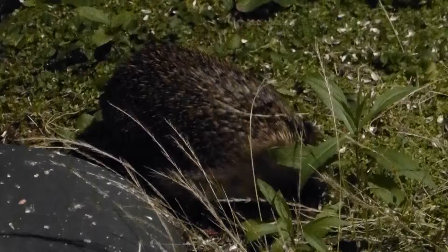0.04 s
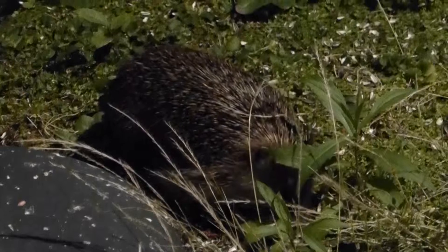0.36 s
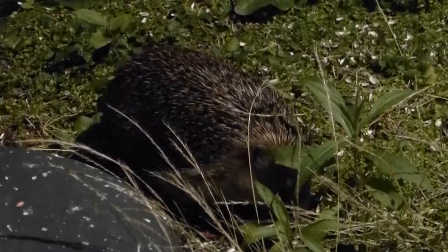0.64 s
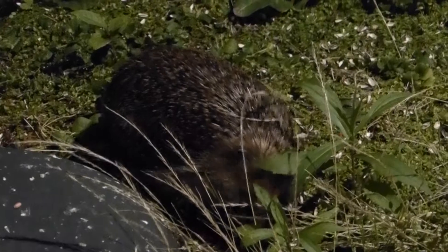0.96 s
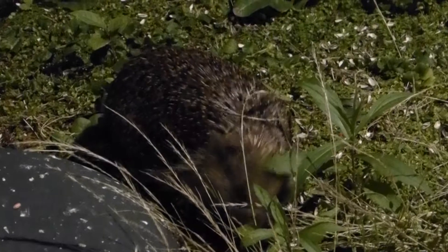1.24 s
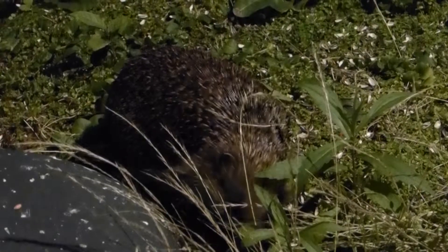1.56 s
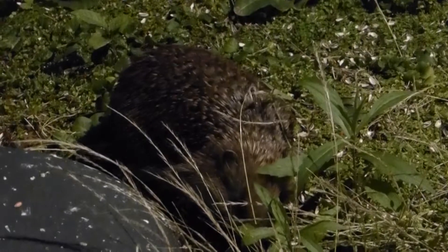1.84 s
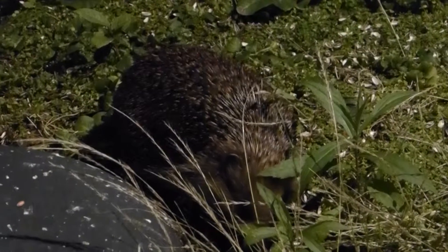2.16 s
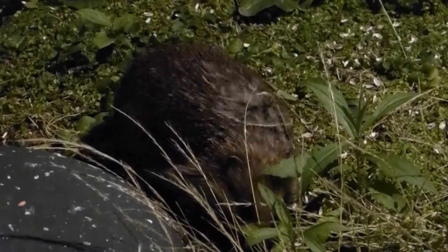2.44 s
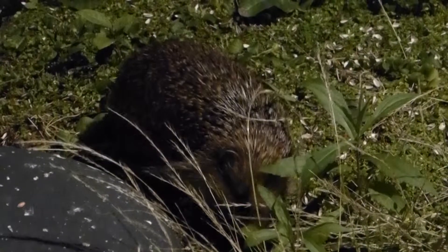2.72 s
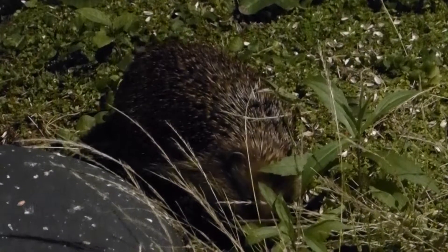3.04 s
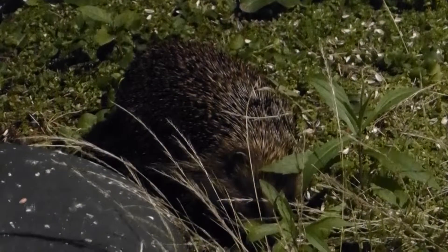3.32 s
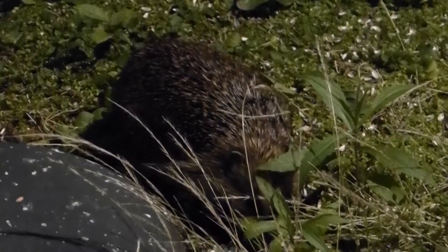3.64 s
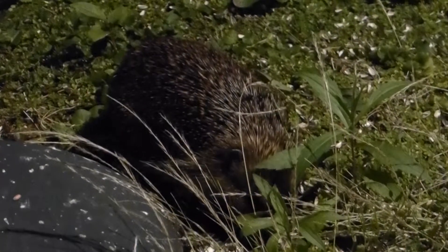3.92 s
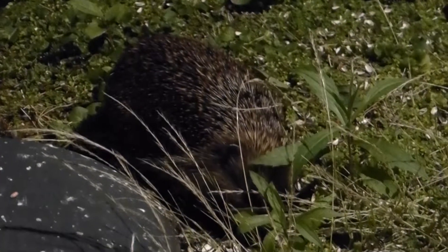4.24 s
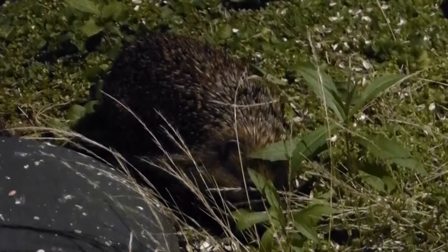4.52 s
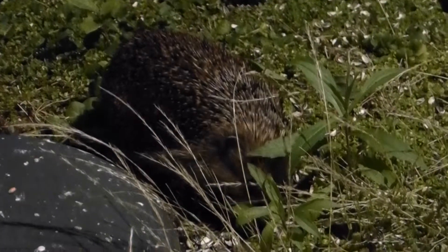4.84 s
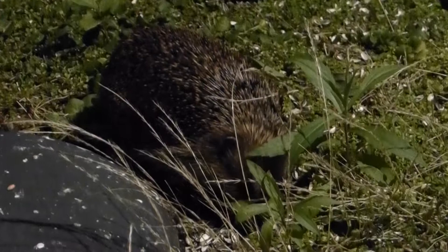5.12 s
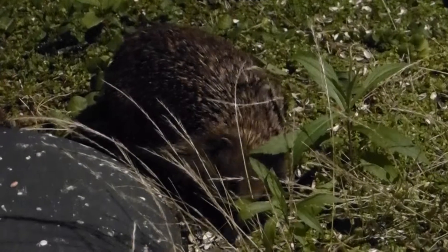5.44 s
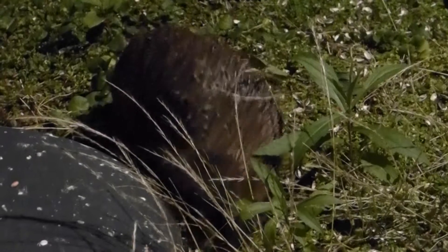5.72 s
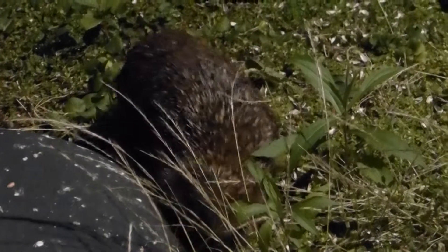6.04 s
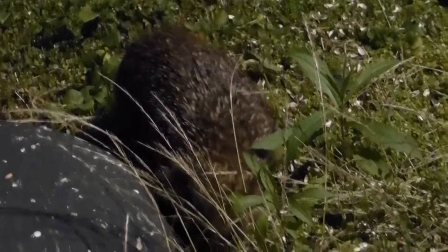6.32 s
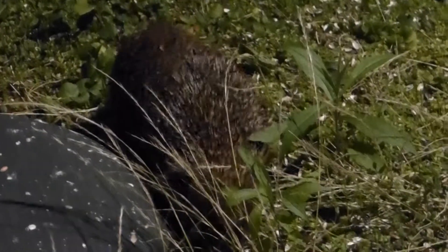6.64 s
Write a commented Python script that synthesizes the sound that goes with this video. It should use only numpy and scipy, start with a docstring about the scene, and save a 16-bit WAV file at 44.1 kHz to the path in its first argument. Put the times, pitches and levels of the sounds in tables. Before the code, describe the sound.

A hedgehog gives one short, sharp squeak among faint ticks of dry stalks and rustling leaves, over low distant traffic.

```python
"""Hedgehog squeak in a garden

A foraging hedgehog gives one short, sharp squeak that falls in pitch: uneven vocal pulses
ring its throat and mouth while air rasps past the teeth. Its mouth opens with a few low pops
and puffs follow the call. Dry stalks tick, leaves brush its spines and something twitters
far off. Nearby walls return a short tail, over a slowly fading bed of distant traffic."""
import sys
import numpy as np
from scipy import signal
from scipy.fft import rfft, irfft
from scipy.io import wavfile

SR = 44100
rng = np.random.default_rng(int(sys.argv[2]) if len(sys.argv) > 2 else 0)


def wav_out(sig):
    """Save sig, one row per channel (or a flat mono array), as 16-bit PCM at SR to the path in sys.argv[1]."""
    wavfile.write(sys.argv[1], SR, np.round(np.clip(np.atleast_2d(sig).T, -1, 1) * 32767).astype(np.int16))


N = 302967
TIME = np.arange(N) / SR
START_S = .59  # silence until here

# broad tone colour of the throat: (frequency [Hz], gain [dB])
THROAT_EQ = [(400, -18), (750, 4), (1150, -1), (1700, 3.5), (2450, -1), (3300, -5.5), (4300, -11.5),
             (5300, -7), (6600, -1.5), (8000, -5), (9100, -33), (10500, -14), (13000, -23), (15100, -13),
             (15800, -16)]
# sharp resonances of the open mouth: (centre [Hz], width [Hz], gain [dB])
MOUTH_RESONANCES = [(5750, 330, 0), (6260, 330, 1.5), (7593, 354, -1.5)]
# air rushing past the teeth: (frequency [Hz], gain [dB])
RASP_EQ = [(200, -32), (800, 2), (2000, -11), (3400, -4.5), (4300, -14), (6200, -4), (8000, -6), (9200, -8),
           (10500, -7.5), (15500, -13)]
# the mouth opening and shutting: (time [s], level [dB], ring [Hz], t60 [s])
MOUTH_POPS = [(2.486, -20.5, 845, 0.014), (2.4883, -20.5, 820, 0.014), (2.4924, -19.5, 440, 0.016),
              (2.6795, -31.5, 1820, 0.021), (2.683, -30, 880, 0.024)]
# voiceless puffs, the sharpest a spit: (peak time [s], level [dB], attack [s], t60 [s])
BREATH_PUFFS = [(2.612, -42, .012, .42), (2.6807, -33.5, .006, 0.032), (2.684, -41.5, .018, 0.2)]
# tone colour of the puffs: (frequency [Hz], gain [dB])
PUFF_EQ = [(300, -14), (900, 10), (1900, 1.5), (3400, -2), (4600, -3.5), (6000, 3), (8000, -6), (12500, -2),
           (15500, -16)]
# dry stalks snapping: (time [s], peak level [dB], centre [Hz], width [octaves])
STALK_TICKS = [(.8565, -36, 2880, .3), (.875, -34.5, 9000, .5), (.926, -35.5, 1940, 0.18),
               (.94, -42, 3000, .7), (1.009, -34, 2790, 0.23), (1.0099, -35.5, 6500, 0.98),
               (1.1681, -40, 9030, .27), (1.5878, -41, 10500, .5), (1.8068, -36, 12500, .4),
               (1.8776, -40, 8050, 0.21), (2.1255, -37.5, 13000, .45), (2.3136, -42.5, 3070, 0.36),
               (2.4333, -40, 3100, 0.76), (2.914, -40.5, 3000, 0.71), (3.7936, -37, 8900, 0.28),
               (3.799, -37, 8500, 1), (4.0976, -39, 11500, .5), (4.4081, -35, 9500, .5),
               (4.642, -39, 8060, .34), (4.6922, -44, 7500, .36), (5.308, -41, 4600, 1),
               (5.6864, -43, 11500, .6), (5.723, -35, 13000, .5)]
# leaves on the spines: (mid time [s], length [s], level [dB], centre [Hz], width [octaves])
LEAF_BRUSHES = [(0.778, 0.14, -55.5, 5000, 0.82), (0.81, 0.082, -52, 2280, 0.25),
                (0.812, 0.044, -53, 9000, 1.2), (1.706, 0.087, -57.5, 6000, 1.14),
                (2.502, .03, -36, 11500, .33), (3.809, 0.044, -58, 8500, .8), (5.716, .04, -50, 10000, 1),
                (5.782, 0.085, -61, 5300, 0.7), (6.048, 0.0485, -60.5, 7000, 1.26),
                (6.788, .1, -63, 12000, .53)]
# faint twittering far off: (mid time [s], level [dB], centre [Hz])
FAR_CHIRPS = [(5.043, -67, 3440), (5.312, -54, 3260), (5.587, -65, 3270), (5.861, -66, 3300),
              (5.91, -62, 3650), (6.229, -63, 2810), (6.638, -62, 3420)]
# early reflections off the ground and nearby things: (delay [s], level [dB])
EARLY_REFLECTIONS = [(.013, -20), (.024, -20), (.038, -20), (.115, -33)]
# decay of the garden's tail: (frequency [Hz], t60 [s])
TAIL_DECAY = [(500, .5), (2500, 0.68), (6000, 0.3074), (14000, 0.7)]
# tone colour of that tail: (frequency [Hz], gain [dB])
TAIL_EQ = [(700, -48), (1700, -7), (3500, 5), (6500, 3.5), (8000, -4), (11000, 3), (15000, -0.5)]
# murmur of distant traffic: (frequency [Hz], gain [dB])
TRAFFIC_EQ = [(30, -10), (62, -26), (105, -14.5), (150, -7), (205, -2.5), (258, 1), (310, -2.5),
              (440, -5.5), (620, -7), (900, -2), (1080, -6.5), (1400, -7), (1900, -17.5), (3000, -27),
              (6000, -37.5)]
# microphone hiss: (frequency [Hz], gain [dB])
HISS_EQ = [(500, -16), (5000, 0), (9700, 0.5), (12000, -1.5), (15500, -14)]
# how alike left and right are in the noise beds: (frequency [Hz], correlation [0 to 1])
BED_CORRELATION = [(30, .4), (100, 0.955), (200, 0.99), (380, 0.943), (700, 0.793), (1400, 0.632),
                   (2800, 0.11), (6000, 0.303), (14000, 0.67)]
# the microphone's bass cut and narrow treble notch: (frequency [Hz], gain [dB])
MICROPHONE_EQ = [(30, -22.5), (62, -9.5), (120, 0), (8700, 0), (9120, -12.5), (9550, -2)]
# slight mismatch of the two microphone ports: (frequency [Hz], left minus right [dB])
PORT_TILT = [(200, 0), (700, -0.1), (1300, 1.08), (2400, -1), (4400, 0.6), (8000, -0.2), (15000, 0.5)]

SQUEAK_S, ATTACK_S, HOLD_S, RELEASE_S = 2.492, .028, .062, .053
HOLD_DB, ONSET_DB, END_DB = -24, -5.5, -12.5  # onset and end are relative to the hold
ONSET_HZ, STRAIN_HZ, BREAK_HZ, SLACK_HZ = 850, 945, 880, 728
BREAK_S, SAG_S = .029, .102  # time into the squeak where it breaks; length of the fall
RASP_DB, RASP_PER_DB = -10, .47  # air against tone at full effort; its rise per dB of effort lost


def squeak(jitter_cycles=.024, shimmer=1.96, brighten=.86, smear=.128):
    """Uneven vocal pulses ring the throat and mouth; air rasps through, more so at low effort."""
    corners = np.cumsum([0, ATTACK_S, HOLD_S, RELEASE_S])
    t = np.arange(0, corners[-1], 1 / SR)
    effort_db = np.interp(t, corners, [ONSET_DB, 0, 0, END_DB])
    cycles = np.cumsum(squeak_pitch(t)) / SR
    # each pulse comes a little early or late, which blurs the high overtones most
    phase = 2 * np.pi * (cycles + jitter_cycles * wander(len(t), 180))
    harmonic = np.arange(1, 23)[:, None]
    # the folds close less sharply as the effort drops, and differently on each cycle
    closure_db = brighten * effort_db + shimmer * np.tanh(wander(len(t), 490))
    weights = amp(closure_db * np.minimum(np.log(harmonic), 2))
    # high overtones lag a little, which smears each pulse
    folds = (weights * np.cos(harmonic * phase - smear * harmonic ** 2)).sum(0)
    mouth = sum(amp(db) * ring(folds, hz, width) for hz, width, db in MOUTH_RESONANCES)
    tone = unit(colour(folds, THROAT_EQ) + mouth)
    air = rng.standard_normal(len(t)) * (1 + .58 * np.cos(phase))
    rasp = amp(RASP_DB - RASP_PER_DB * effort_db) * unit(colour(air, RASP_EQ))
    envelope = amp(HOLD_DB + effort_db) * signal.windows.tukey(len(t), .06)
    return SQUEAK_S, envelope * (tone + rasp)


def squeak_pitch(t):
    """The pitch climbs with the strain, breaks to a lower note, then sinks as the breath runs out."""
    sag = np.clip((t - BREAK_S) / SAG_S, 0, 1)
    climbing = ONSET_HZ + (STRAIN_HZ - ONSET_HZ) * t / BREAK_S
    sinking = SLACK_HZ + (BREAK_HZ - SLACK_HZ) * np.cos(np.pi * sag / 2) ** 2
    return np.where(t < BREAK_S, climbing, sinking)


def mouth_pop(s, db, hz, t60):
    """A push of air rings the mouth cavity for a few cycles."""
    t = TIME[:SR // 20]
    air = .25 * band(rng.standard_normal(len(t)), hz=1700, octaves=1)
    knock = amp(db - 60 * t / t60) * (np.sin(2 * np.pi * hz * t) + air)
    low_cut = signal.butter(2, 280, "high", fs=SR, output="sos")
    return s, signal.sosfilt(low_cut, knock)


def breath_puff(s, db, attack_s, t60):
    """A soft hiss from the hedgehog's mouth swells and dies away."""
    t = TIME[:SR // 4]
    envelope = np.minimum(t / attack_s, 1) * amp(db - 60 * np.maximum(t - attack_s, 0) / t60)
    return s - attack_s, envelope * unit(colour(rng.standard_normal(len(t)), PUFF_EQ))


def stalk_tick(s, db, hz, octaves, attack_s=.00029, t60=.015):
    """A dry stalk cracks: a noise burst that dies within milliseconds."""
    t = TIME[:SR // 10]
    envelope = amp(-60 * t / t60) * (1 - np.exp(-t / attack_s))
    burst = band(rng.standard_normal(len(t)), hz, octaves) * envelope
    return s, amp(db) * burst / abs(burst).max()


def stray_ticks(count=14, level_db=-48, spread_db=4, low_hz=5500, high_hz=13000, octaves=.49):
    """Cues for fainter stalks that snap at random throughout the foraging."""
    when, strength, height = rng.random((count, 3)).T
    s = START_S + when * (TIME[-1] - START_S)
    db = level_db + spread_db * (2 * strength - 1)
    hz = low_hz * (high_hz / low_hz) ** height
    return [(*cue, octaves) for cue in zip(s, db, hz)]


def brush(s, length_s, db, hz, octaves, grain_db=4):
    """A short swell of fine, uneven grains, as of a leaf dragging over spines."""
    t = TIME[:SR // 3]
    grains = rng.standard_normal(len(t)) * amp(grain_db * wander(len(t), 700))
    swell = np.sin(np.pi * np.minimum(t / length_s, 1))
    return s - length_s / 2, amp(db) * band(grains, hz, octaves) * swell


def litter(per_s=22, size_db=4, decay_s=.0028, level_db=-73):
    """The ground cover gives tiny crackles underfoot."""
    sizes = amp(size_db * np.minimum(rng.exponential(1, N), 2))
    hits = sizes * (rng.random(N) < per_s / SR)
    envelope = signal.lfilter([1], [1, -np.exp(-1 / (decay_s * SR))], hits)
    return amp(level_db) * band(envelope * rng.standard_normal(N), hz=9230, octaves=.74)


def far_chirp(s, db, hz):
    """One short, scratchy note: the grainy swell squeezed into a narrow band."""
    return brush(s, length_s=.03, db=db, hz=hz, octaves=.078)


def garden_echo(x, tail_db=-16, attack_s=.0071, width=.51):
    """A few early reflections, and a faint stereo tail off the walls and hedges."""
    hz, t, spectra = signal.stft(rng.standard_normal((2, SR // 2)), SR, nperseg=256)
    decay_db = 60 * t / read(TAIL_DECAY, hz)[:, None]
    spectra = spectra * amp(read(TAIL_EQ, hz)[:, None] - decay_db)
    tail = signal.istft(spectra, SR, nperseg=256)[1]
    tail *= np.minimum(TIME[:tail.shape[1]] / attack_s, 1)
    response = amp(tail_db) * tail / np.linalg.norm(tail[0])
    for k, (delay, db) in enumerate(EARLY_REFLECTIONS):
        response[:, round(delay * SR)] += amp(db) * np.array([1, (-1) ** k / 2])  # alternate sides
    mid, side = signal.oaconvolve(x[None], response, axes=1)[:, :N]
    return x + mid + width * np.array([side, -side])


def traffic(start_db=-39.5, fade_db_per_s=.74, waver_db=.5):
    """A far road murmurs, wavering slightly as the traffic recedes."""
    return noise_bed(TRAFFIC_EQ) * amp(start_db - fade_db_per_s * TIME + waver_db * wander(N, 10.5))


def noise_bed(eq):
    """Coloured stereo noise, narrowest around 200 Hz and wide in the treble."""
    hz = np.fft.rfftfreq(N, 1 / SR)
    mid, side = rfft(rng.standard_normal((2, N))) * amp(read(eq, hz))
    correlation = read(BED_CORRELATION, hz)
    mid, side = mid * np.sqrt(1 + correlation), side * np.sqrt(1 - correlation)
    return unit(irfft(np.array([mid + side, mid - side]), N))


def amp(db):
    """Decibels to gain."""
    return 10 ** (np.asarray(db) / 20)


def unit(x):
    """Scales to rms 1."""
    return x / np.sqrt(np.mean(x ** 2) + 1e-20)


def read(curve, hz):
    """Reads a curve on a log-frequency axis."""
    f, value = np.transpose(curve)
    return np.interp(np.log(hz + 1), np.log(f), value)


def colour(x, eq, size=4096):
    """Minimum-phase EQ that follows the given curve."""
    log_gain = np.log(amp(read(eq, abs(np.fft.fftfreq(size, 1 / SR)))))
    response = np.fft.ifft(np.exp(np.conj(signal.hilbert(log_gain)))).real
    return signal.oaconvolve(x, response[:size // 2])[:len(x)]


def band(x, hz, octaves):
    """A bell-shaped band around hz, at rms 1."""
    f = np.fft.rfftfreq(len(x), 1 / SR) + 1
    bell = np.exp(-.5 * (np.log2(f / hz) / octaves) ** 2)
    return unit(irfft(rfft(x) * bell, len(x)))


def ring(x, hz, width_hz):
    """A resonance with gain 1 at its centre."""
    return signal.lfilter(*signal.iirpeak(hz, hz / width_hz, fs=SR), x)


def wander(length, rate_hz):
    """Smooth random modulation at rms 1, rolling off above the given rate."""
    f = np.fft.rfftfreq(length, 1 / SR)
    roll_off = (f > 0) / (1 + (f / rate_hz) ** 4)
    return unit(irfft(rfft(rng.standard_normal(length)) * roll_off, length))


def add(mix, s, sound):
    """Mixes a sound in at time s."""
    part = mix[round(s * SR):][:len(sound)]
    part += sound[:len(part)]


def scene():
    """The hedgehog dead centre in the garden's echo, traffic and hiss all around."""
    bed = traffic() + amp(-64) * noise_bed(HISS_EQ)
    centre = litter()
    add(centre, *squeak())
    layers = [(mouth_pop, MOUTH_POPS), (breath_puff, BREATH_PUFFS), (stalk_tick, STALK_TICKS),
              (brush, LEAF_BRUSHES), (far_chirp, FAR_CHIRPS), (stalk_tick, stray_ticks())]
    for source, cues in layers:
        for cue in cues:
            add(centre, *source(*cue))
    return garden_echo(centre) + bed


def record(dry, high_cut_hz=15720):
    """Microphone colour, a hard cut-in after a moment of silence, and a steep high cut."""
    coloured = [colour(channel, MICROPHONE_EQ) for channel in dry]
    tilt_db = read(PORT_TILT, np.fft.rfftfreq(N, 1 / SR)) / 2
    ports = irfft(rfft(coloured) * amp([tilt_db, -tilt_db]), N)
    high_cut = signal.firwin(511, high_cut_hz, window=("kaiser", 9), fs=SR)
    return signal.oaconvolve(ports * (TIME >= START_S), high_cut[None], "same")


dry = scene()
out = record(dry)
wav_out(out)
```